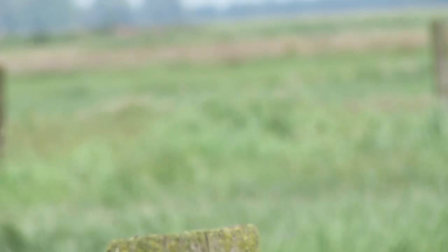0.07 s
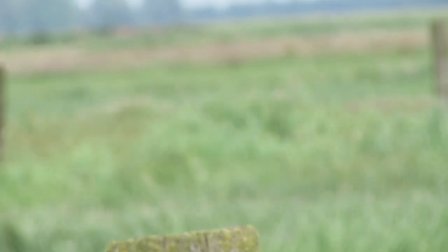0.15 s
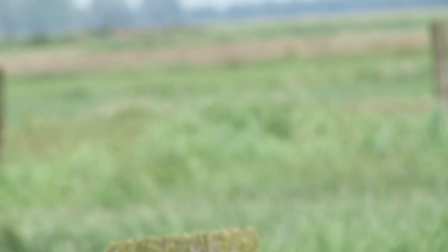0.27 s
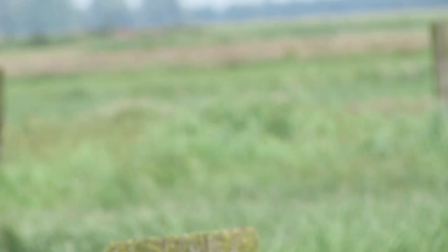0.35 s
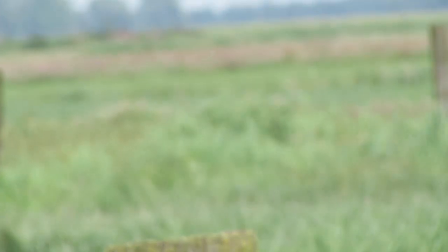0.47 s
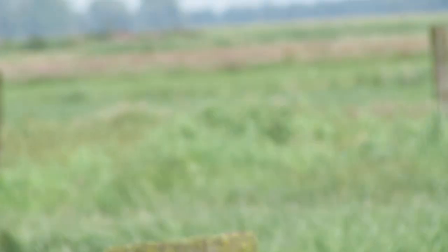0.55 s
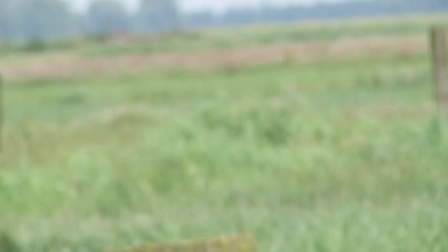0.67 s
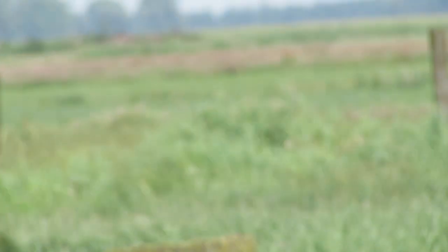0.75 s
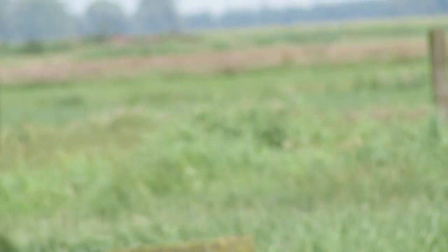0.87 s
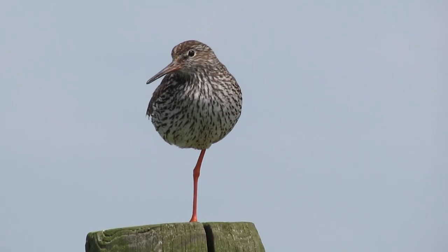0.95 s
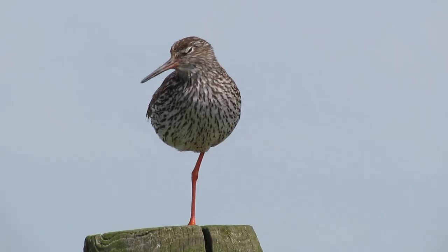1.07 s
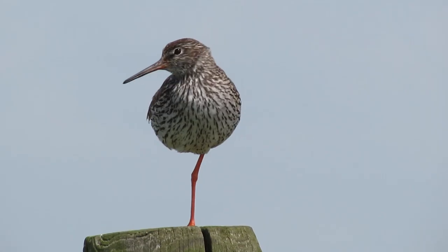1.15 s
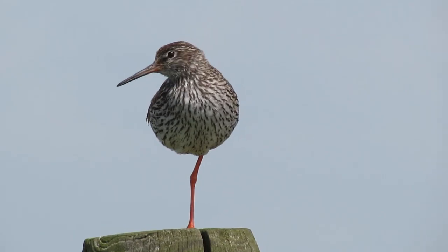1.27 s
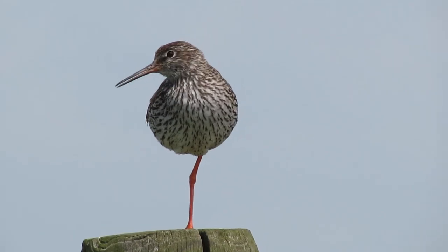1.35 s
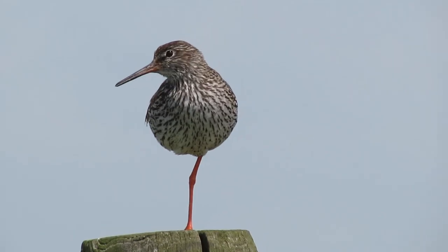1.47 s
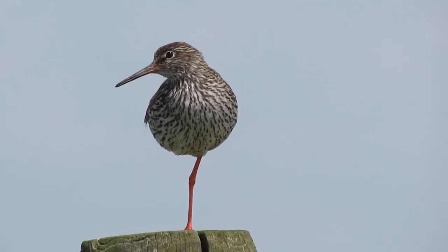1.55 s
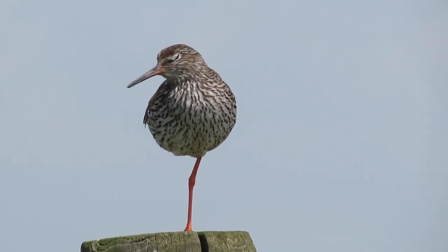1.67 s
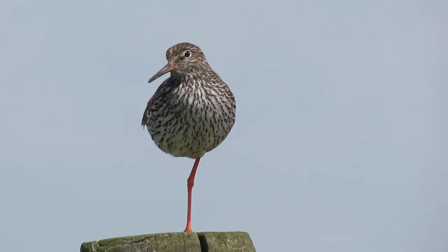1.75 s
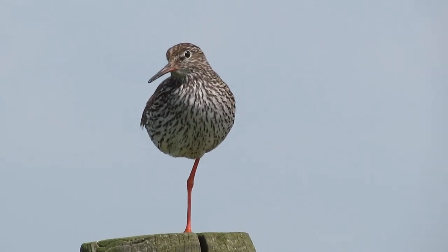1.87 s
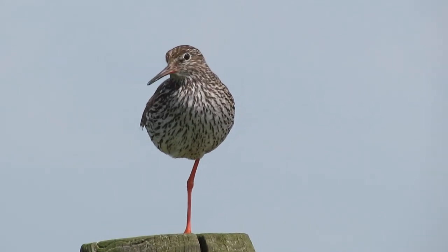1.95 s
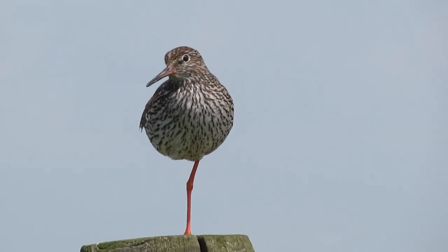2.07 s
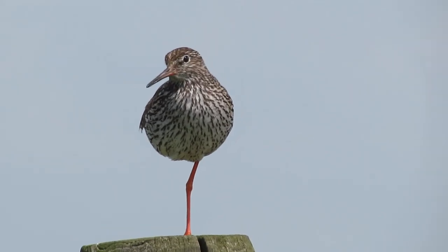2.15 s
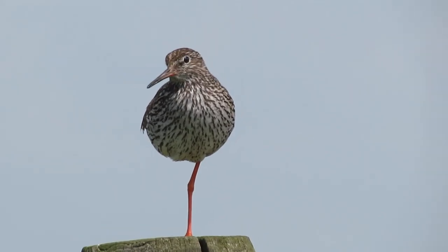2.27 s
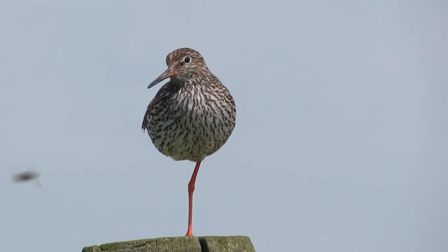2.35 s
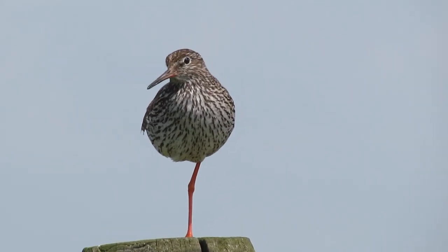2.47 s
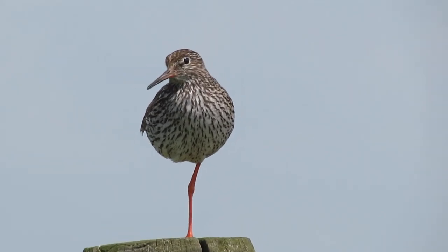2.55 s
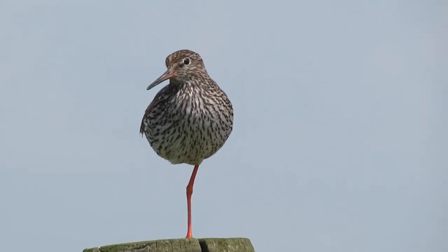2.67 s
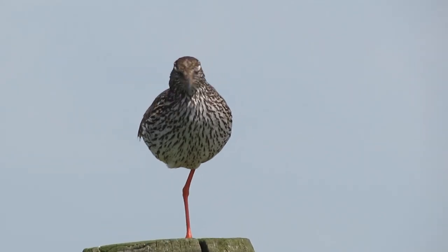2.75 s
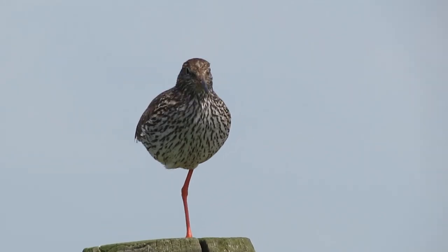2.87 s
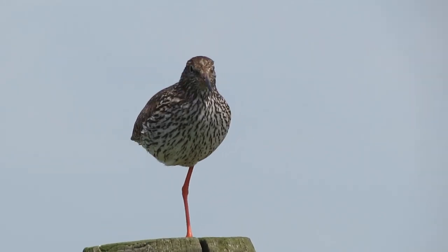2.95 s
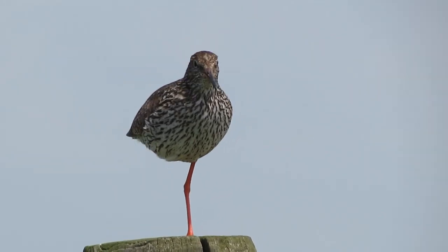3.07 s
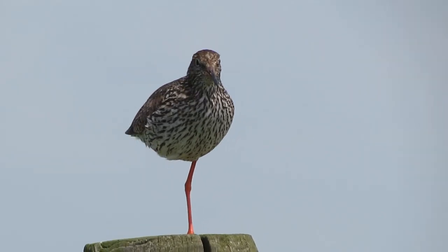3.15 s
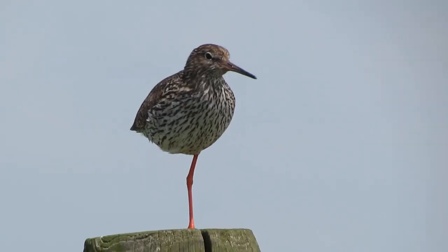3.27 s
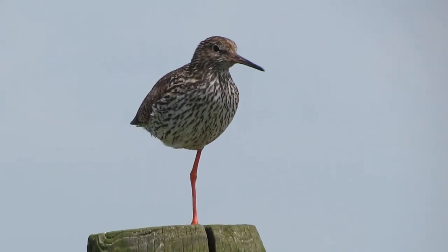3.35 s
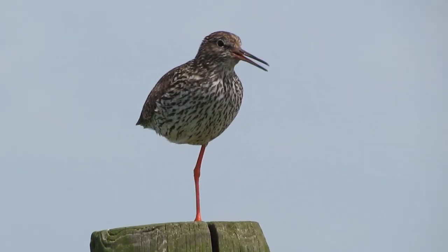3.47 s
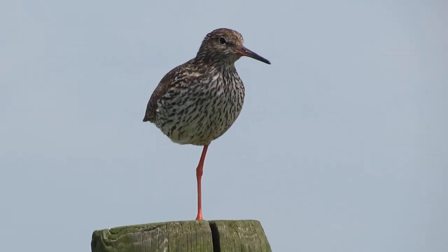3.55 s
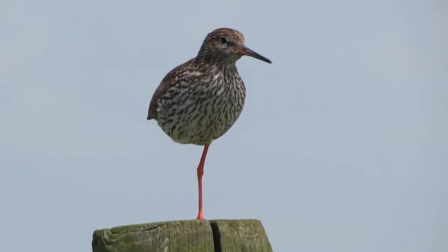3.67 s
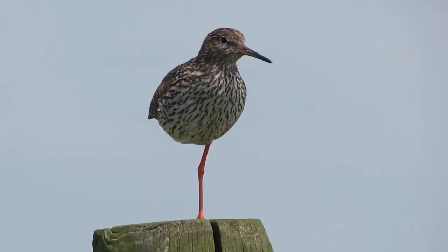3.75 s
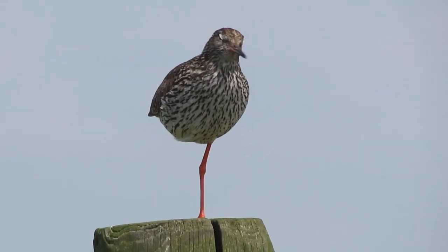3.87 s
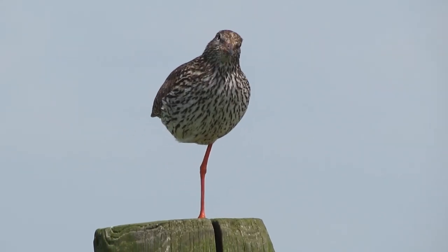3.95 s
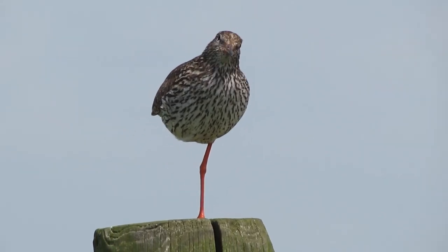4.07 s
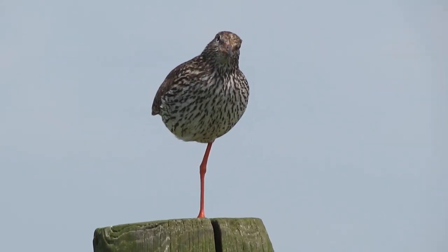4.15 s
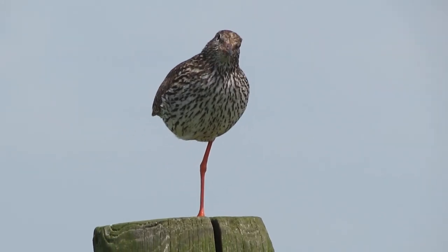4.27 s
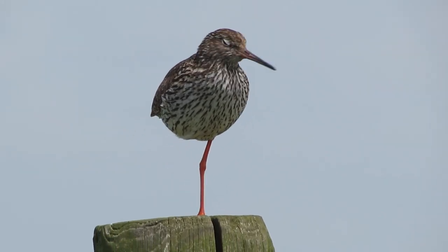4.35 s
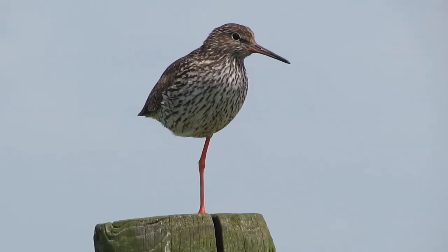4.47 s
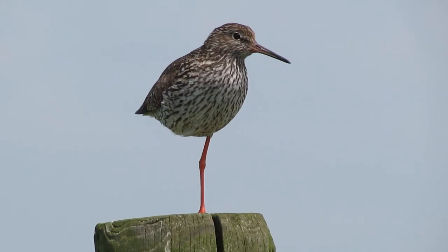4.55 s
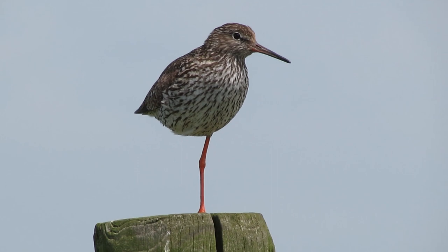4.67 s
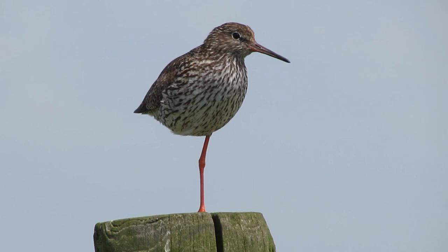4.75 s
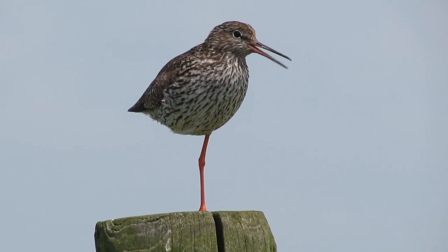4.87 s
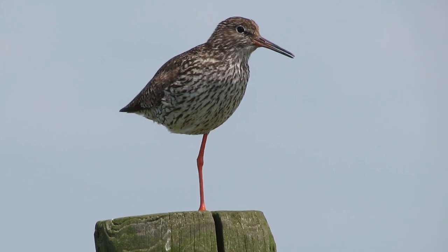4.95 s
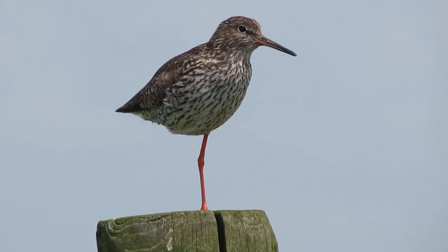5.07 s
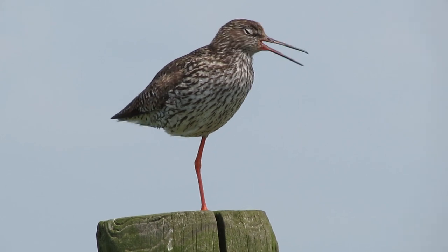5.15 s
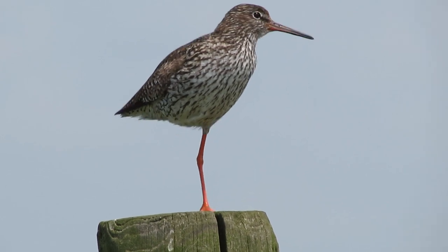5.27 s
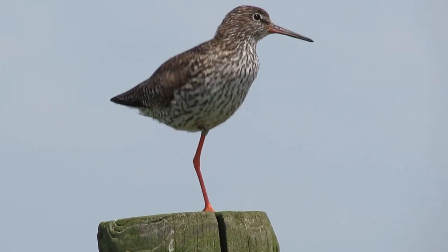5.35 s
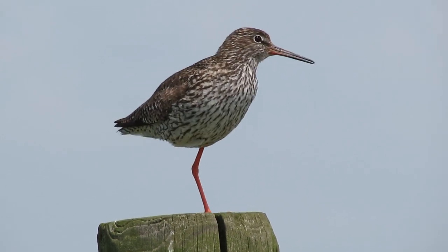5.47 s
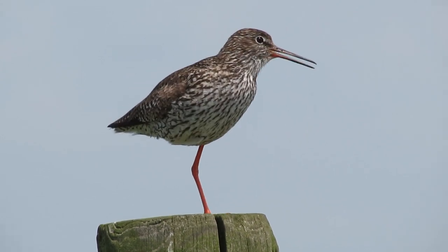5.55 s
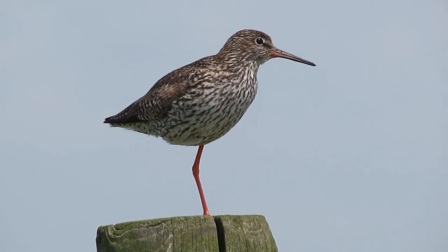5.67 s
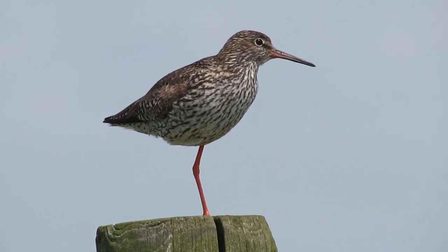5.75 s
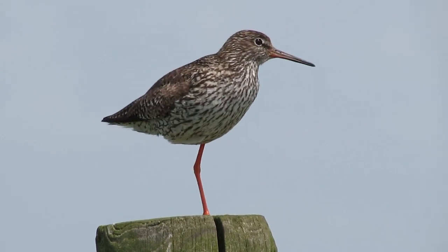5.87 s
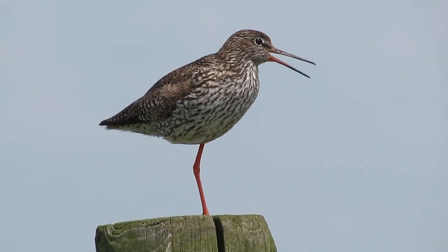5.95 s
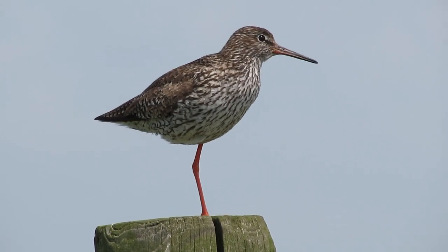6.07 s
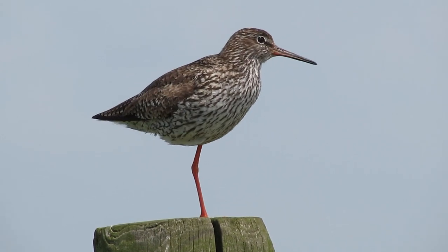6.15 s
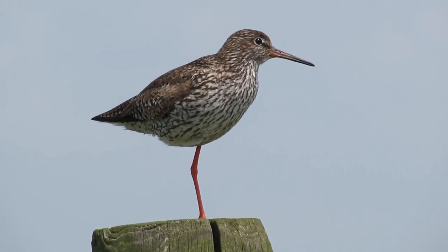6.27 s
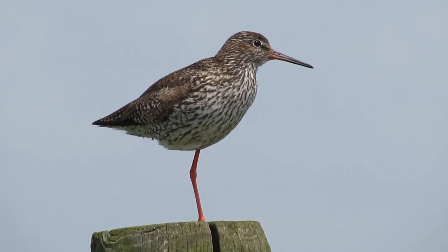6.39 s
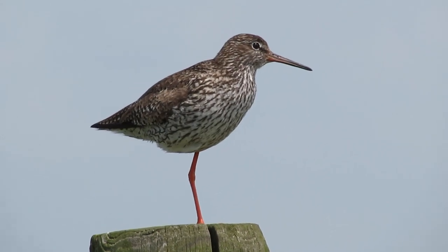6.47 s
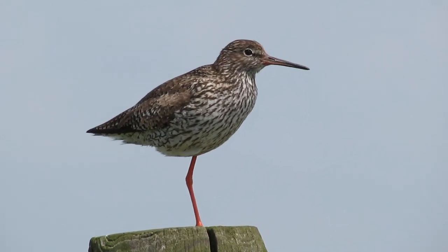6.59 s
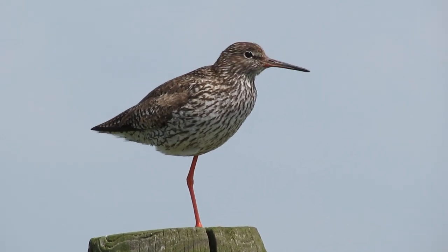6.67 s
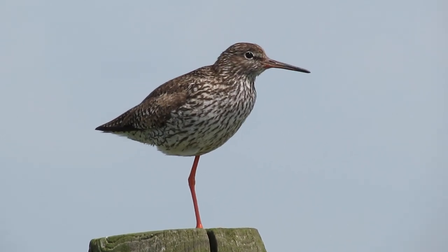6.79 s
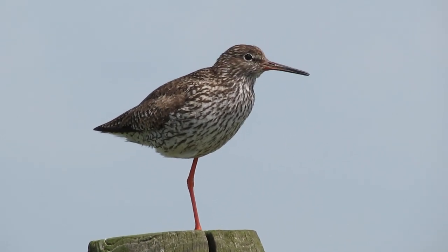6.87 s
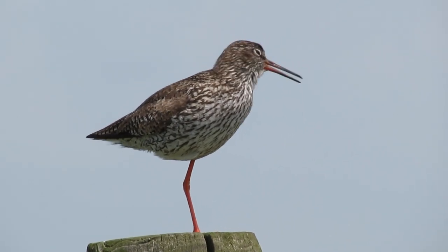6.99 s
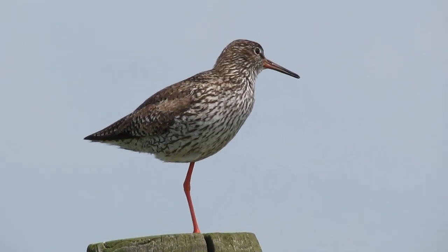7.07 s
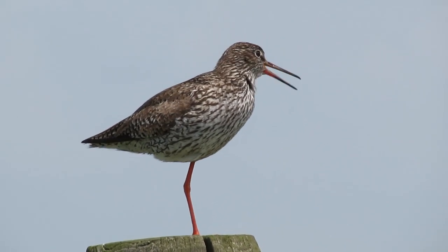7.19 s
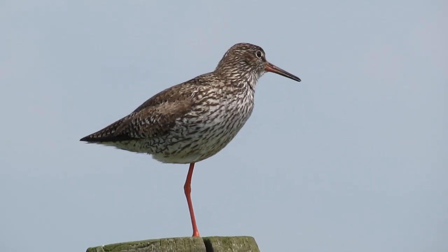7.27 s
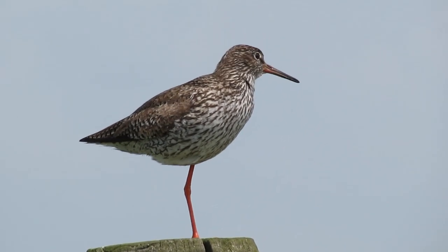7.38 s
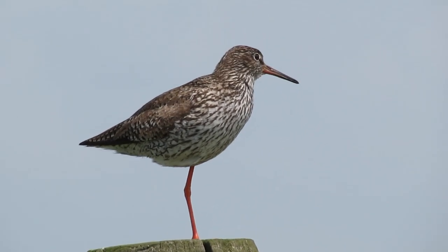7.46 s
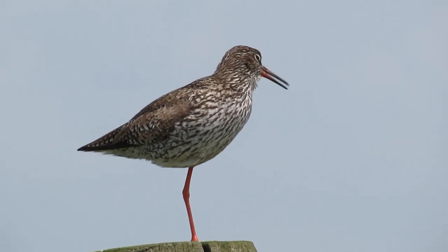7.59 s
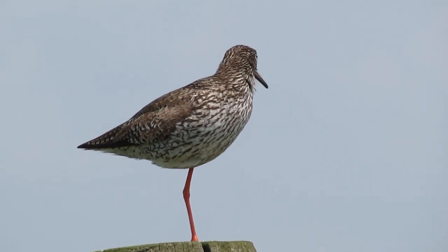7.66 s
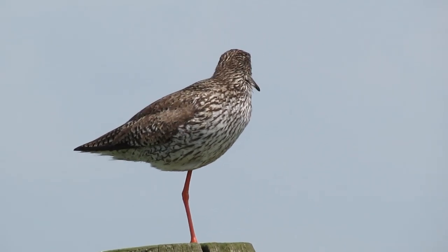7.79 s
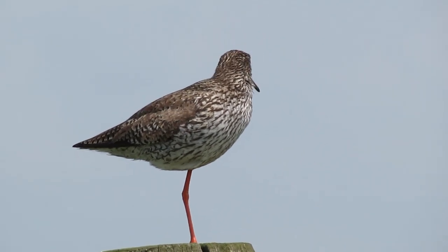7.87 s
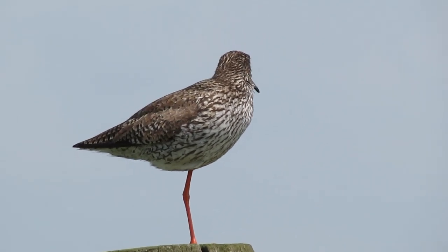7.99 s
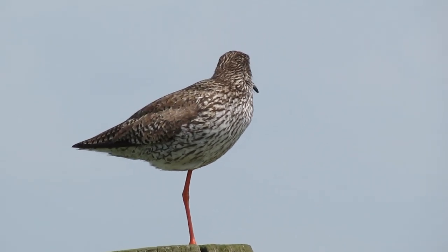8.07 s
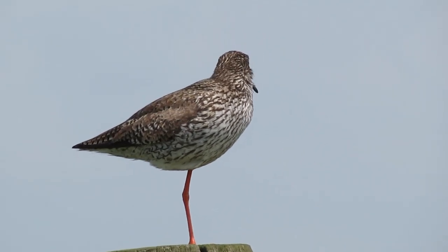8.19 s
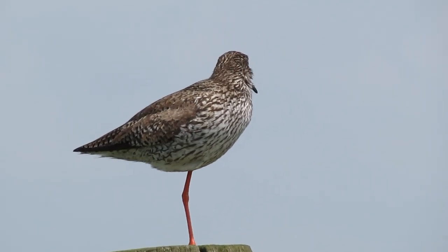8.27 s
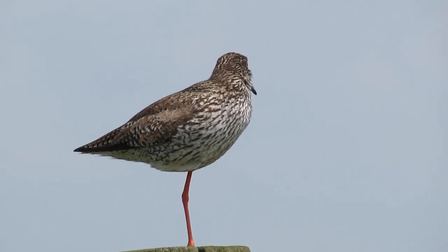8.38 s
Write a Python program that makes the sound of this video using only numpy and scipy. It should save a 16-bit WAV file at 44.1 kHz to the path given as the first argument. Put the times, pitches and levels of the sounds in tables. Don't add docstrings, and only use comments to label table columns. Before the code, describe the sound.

Quiet open meadow in wide stereo: soft airy hiss and a low, uneven rumble of far traffic. At 0.04 s a nearby wader gives a sharp chip, under a tenth of a second: a rough throat croak, a thin high squeak, then a piercing whistle falling slightly around 2.5 to 2.9 kHz. At 0.96 s the background changes abruptly to a nearer grassy hiss. Chips follow at 1.1 and 1.5, then 3.1 and 3.55, then 4.95, 5.25, 5.6 and 6.05, finally 7.05, 7.3 and 7.7, the last two strongest. Short returns barely blur them. Between them, very faint distant larks and waders chip, trill and slur, with a clearer falling answer at 5.5. Traffic swells briefly near 3.5 and longer around 4.15. A faint finger tick comes at 4.87; a weak low engine hum rises after 7.5. Wind and birds continue until about 8.4.

```python
import sys
import numpy as np
from scipy import signal
from scipy.fft import rfft, irfft, next_fast_len
from scipy.io import wavfile
from scipy.ndimage import map_coordinates

SR = 44100
rng = np.random.default_rng(int(sys.argv[2]) if len(sys.argv) > 2 else 0)


def volts_from_decibels(level):
    exponent = np.asarray(level, float) / 20
    return 10 ** exponent


def dump_mix(stems):
    frames = np.atleast_2d(stems).T
    limited = np.clip(frames, -1, 1)
    pcm = np.round(limited * 32767).astype(np.int16)
    wavfile.write(sys.argv[1], SR, pcm)


N = 371322

# [f/Hz, level per Hz/dB]
AIR_BEFORE = [(12, -33), (20, -9), (47, 2.5), (90, -0.5), (710, -14), (1050, -13), (1680, -20), (5000, -26),
              (10600, -34), (12200, -34.5), (13300, -33), (15700, -67)]
# [f/Hz, side minus mid level/dB]
WIDTH_BEFORE = [(60, 3), (110, 6.5), (200, 6.5), (380, 5.5), (700, 6), (1290, 2), (2380, 2), (4400, -1.5),
                (8120, 1), (15000, 2)]
# [f/Hz, level per Hz/dB]
AIR_AFTER = [(12, -49), (20, -8.5), (59, 0), (93, -5.5), (162, -1), (299, -9), (374, -12), (653, -17.5),
             (1020, -16.5), (1550, -21.5), (5280, -22.5), (12500, -33), (15700, -37)]
# [f/Hz, side minus mid level/dB]
WIDTH_AFTER = [(60, 3.5), (110, 4.5), (200, 1), (380, 6.5), (700, 4.5), (1290, 1.5), (2380, 2),
               (4400, -4.5), (8120, 2), (15000, 3.5)]
# [t/s, half length/s, level over the usual rumble/dB]
PASSES = [
    (0.498, .06, 5),
    (1.15, 0.26, 2),
    (2.398, 0.39, 3.5),
    (3.466, 0.055, 9.5),
    (4.15, 0.56, 8),
    (5.502, 0.11, 4),
    (6.8, 0.33, 2),
]
# [t/s, level/dB]
GRASS = [
    (.96, 1),
    (2.0, -0.5),
    (2.4, 0.5),
    (3.6, -0.4),
    (4.45, -1.5),
    (5.2, 1),
    (6.6, -0.5),
    (8.42, 1),
]
# [t/s, rise time/s, rise level/dB, hold level/dB, f at the break/Hz]
CROAKS = [(0.0407, 0.011, -32, -36.5, 1553), (1.082, .012, -35, -29, 1360),
          (1.486, 0.011, -32.5, -31, 1536), (3.111, 0.0097, -33, -26, 1456),
          (3.5559, 0.014, -27.5, -28, 1470), (4.97, 0.013, -31.5, -27.5, 1450),
          (5.244, .013, -33.5, -25.5, 1485), (5.624, .011, -32, -30.5, 1474),
          (6.043, .011, -28, -29.5, 1500), (7.037, 0.011, -25.5, -27.5, 1470),
          (7.285, 0.013, -34.5, -27.5, 1444), (7.6723, 0.012, -27.5, -28, 1470)]
# [t/s, f/Hz, level/dB, overtone level/dB]
SQUEAKS = [(0.059, 5140, -31.5, -22), (1.101, 5200, -33.5, -20), (1.507, 5230, -29, -14),
           (3.129, 5210, -29.5, -8), (3.578, 5100, -31, -7), (4.988, 5080, -31, -18),
           (5.263, 5020, -30, -15), (5.641, 4960, -31, -12), (6.061, 5110, -26, -18),
           (7.057, 5030, -27, -13), (7.303, 4900, -33.5, -6), (7.691, 4960, -33, -7.5)]
# [t/s, length/s, start f/Hz, end f/Hz, peak level/dB]
WHISTLES = [(0.064, 0.022, 3360, 2590, -24.5), (1.11, 0.026, 2890, 2630, -18.5),
            (1.51, 0.026, 2950, 2595, -23.5), (3.137, .012, 2810, 2660, -22),
            (3.585, .021, 2880, 2510, -23.7), (4.998, 0.028, 2800, 2540, -22.5),
            (5.271, .033, 2860, 2504, -19.5), (5.649, 0.03, 2910, 2487, -17.5),
            (6.068, 0.021, 2905, 2510, -16.5), (7.061, 0.032, 2810, 2500, -21.5),
            (7.309, 0.037, 2870, 2480, -12.5), (7.696, 0.034, 2887, 2446, -13.5)]
# [3rd partial level/dB, rasp level/dB, left minus right level/dB,
# treble left minus right level/dB, turn-away level/dB]
HEADS = [(-35, 5.5, -6.5, -3, -8), (-32, 0.5, -1, -1.8, -15), (-21, 3.5, -2, 1.5, 2), (-19, 1, -5.5, 1, 0),
         (-25, -2.5, -1.5, 0, -5), (-21.5, -1, -2.5, 0, -9), (-23, -6.5, -3, 2, -0.5),
         (-25.5, -3, -2.5, 2, -7), (-19.5, 0.5, -3.5, -0.5, -8), (-21, -5.5, -2, 1, -5),
         (-25.5, -3.5, -1.5, 4, -10), (-25, -6.5, -1.4, 3, -19)]
# [time until fully open/s,
# then level against its peak/dB at entry, middle, late part, end]
BREATHS = [(.0006, -3, -.6, -.6, -4.5), (.0012, -8, -5, -8, -13), (.0045, .6, -3, -7, -7),
           (.0012, -1.2, .3, -1.2, -3), (.0015, 2.2, -1.2, -1.2, -4), (.006, -2.2, -2.2, -2.5, -6),
           (.0035, -2.2, -3.5, -2.2, -6), (.0003, -6, .6, -4.5, -9), (.0015, -6, -2.2, -5.5, -7.5),
           (.0015, 2.2, 3.5, 1.5, -3), (.0021, -4, -5, -5.5, -7.5), (.0012, -6, -5.5, -9.5, -17)]
# [f/Hz, width/Hz, level/dB]
THROAT = [(2803, 1780, 4), (4380, 3300, -10), (6330, 1060, -4.5), (7660, 870, -19), (10900, 2000, -19)]
PORT_LEAD = [-1.5, 0.71]
# [t/s, length/s, start f/Hz, end f/Hz, level/dB]
FAR_LEFT = [
    (1.83, 0.015, 3100, 2900, -46.5),
    (1.86, 0.015, 3080, 2960, -47.5),
    (1.88, 0.046, 4560, 3980, -58),
    (4.62, 0.054, 3440, 3420, -58),
    (4.68, 0.044, 3430, 3450, -55.5),
    (6.27, 0.018, 5380, 4630, -56),
    (6.58, 0.032, 4980, 4170, -59),
    (6.93, 0.023, 4800, 4650, -60),
]
# [t/s, length/s, start f/Hz, end f/Hz, level/dB]
FAR_AHEAD = [(.18, .02, 5150, 5550, -62), (.267, .07, 4900, 5450, -65), (.39, 0.075, 4600, 5250, -66),
             (.53, .085, 4500, 5140, -64), (1.165, .021, 4130, 3670, -55), (1.318, 0.015, 5000, 3980, -60),
             (1.415, .01, 2600, 2200, -51), (1.66, .079, 4520, 4440, -61.5),
             (1.77, .125, 3960, 3730, -57.5), (2.42, 0.038, 3280, 3520, -58),
             (2.785, .025, 2580, 2950, -57), (2.3, 0.24, 760, 758, -61), (2.34, 0.076, 1506, 1453, -59),
             (4.24, 0.15, 3940, 3600, -59.5), (6.67, .05, 3850, 3830, -64),
             (7.245, 0.089, 3440, 3464, -53.5)]
# [t/s, length/s, start f/Hz, end f/Hz, level/dB]
FAR_RIGHT = [
    (.09, 0.046, 4700, 4200, -67),
    (.146, 0.014, 3050, 2680, -50),
    (.2, .11, 3840, 3720, -69),
    (.425, 0.026, 2900, 2930, -59),
    (.672, .016, 3280, 3200, -55),
    (.692, 0.018, 3240, 3070, -52.5),
    (1.34, 0.026, 4150, 4420, -52.5),
    (7.16, 0.035, 4500, 4300, -57),
]
# [t/s, length/s, start f/Hz, end f/Hz, level/dB]
SWOOPS = [
    (2.011, 0.16, 4600, 3600, -52),
    (4.514, 0.16, 4360, 3670, -55.5),
    (7.786, .04, 4680, 4100, -57),
    (8.002, 0.15, 4670, 3840, -51.5),
    (8.328, 0.11, 4620, 3680, -56.5),
]
# [t/s, length/s, start f/Hz, end f/Hz, level/dB]
KIN = [
    (5.474, 0.18, 3270, 2220, -44.5),
    (8.082, 0.18, 3150, 2200, -58),
]
# [t/s, top f/Hz, level/dB]
ARCHES = [
    (2.51, 3280, -59),
    (2.597, 3200, -58.5),
    (2.684, 3180, -59.5),
]
# [t/s, chips, gap/s, middle f/Hz, level/dB]
TRILLS_UP = [
    (3.446, 4, .0145, 4050, -54),
    (3.862, 6, .026, 4300, -56.5),
    (5.74, 3, .03, 4050, -59),
    (6.466, 7, .0255, 4100, -59.5),
]
# [t/s, chips, gap/s, middle f/Hz, level/dB]
TRILLS_DOWN = [
    (.772, 9, .0216, 3480, -56.5),
    (3.26, 3, .014, 4100, -59),
    (6.17, 4, .014, 3300, -57),
    (6.312, 5, .0125, 3300, -58),
    (6.77, 4, .0165, 4520, -56),
]
# [t/s, length/s, start f/Hz, end f/Hz, level/dB]
BLURRED = [
    (2.255, .1, 4500, 4150, -63),
    (3.303, .14, 4900, 3900, -61),
    (3.51, .16, 4900, 3850, -59),
    (3.7, .062, 3540, 3300, -57),
    (7.83, .14, 4200, 3700, -62),
    (5.21, .022, 4750, 4200, -58),
]
# [t/s, length/s, start f/Hz, end f/Hz, level/dB]
STROKES = [(.134, .016, 4200, 3000, -62), (2.251, .007, 4960, 4000, -49), (2.252, .007, 3600, 2400, -55),
           (2.3, .02, 3700, 3200, -57), (3.345, .016, 4150, 3250, -55), (3.366, .014, 2820, 2350, -55),
           (3.606, .01, 3320, 3700, -49), (4.804, .011, 2200, 3440, -57), (4.83, .012, 2200, 3300, -54),
           (4.858, .012, 2200, 3200, -56), (4.886, 0.0093, 2300, 3200, -55), (5.043, .02, 3700, 4300, -54),
           (5.192, .014, 4250, 4650, -54), (5.228, .016, 3870, 4120, -52), (5.75, .008, 4300, 3850, -56),
           (5.926, .01, 3170, 3250, -57), (6.18, 0.023, 2850, 2500, -58), (6.292, .008, 5000, 4600, -59),
           (6.422, .014, 5550, 5400, -58), (7.79, .012, 5000, 5150, -53)]
# [t/s, f/Hz, level/dB]
ENGINES = [
    [(.9, 67.3, -54.5), (1.6, 66.5, -58.5), (3.6, 66.16, -64.5), (5.5, 66.5, -64), (7.2, 67, -59),
     (8.42, 65.6, -64)],
    [(7.4, 65.2, -71), (7.55, 77.4, -50.5), (7.87, 94, -58), (8.0, 88.1, -58), (8.42, 78, -56)],
]
WHISPERED = [1, 2, 3, 6, 10]
# [t after the tick/s, width/s, size]
KNOCKS = [
    (.0004, 0.000027, 1.7),
    (.0015, 0.000079, -3.5),
    (.0026, .00015, 0.9),
    (.0058, 0.00038, 0.95),
]

SCENE_CHANGE_S = .958
AIR_BEFORE_DB, AIR_AFTER_DB = -52.5, -50.5
CROAK_HZ, HOLD_HZ = 1033, 2188
JUMP_S, RASP_SHARE, CHEST_DB = .001, .45, -44.5
ATTACK_S, OPENING_S, CLOSING_S = .0054, .0022, .004
BEND, SECOND_DB = 2, -43.5
VEIL_DB, SUM_TONE_DB = -34, 8
POST_S, POST_DB = .0099, -15
ECHO_DB, ECHO_SHARE = -18.5, .46
BLUR_S, BLUR_DB = .01, -33
SWOOP_S, SWOOP_SHARE, SWOOP_FADE_DB = .018, .58, -4
KIN_DROP, KIN_FADE_DB = .13, -5
ARCH_S, ARCH_TOP, ARCH_RISE, ARCH_FALL = .05, .5, .12, .36
DROOP, LIFT = 2.4, .8
BROKEN_DB, BROKEN_PITCH = 4, .012
CHIP_S, CHIP_UP, CHIP_DOWN = .01, .07, -.02
TICK_S, TICK_DB = 4.8716, -36


def colour(table, hz):
    f, db = np.transpose(table)
    return np.interp(np.log(hz + 1e-9), np.log(f), db)


def walk(rate, size):
    knots = rng.standard_normal(128)
    return 0.962 * map_coordinates(knots, [np.arange(size) * rate / SR], order=1, mode="wrap")


def tone(hz):
    return 2 * np.pi * np.cumsum(hz) / SR


def gate(t, start, end, attack, release):
    opening = np.clip((t - start) / attack, 0, 1)
    closing = np.clip((end - t) / release + 1, 0, 1)
    return np.sin(np.pi / 2 * opening * closing) ** 2


def filtered(x, order, hz, kind="low"):
    return signal.sosfilt(signal.butter(order, hz, kind, fs=SR, output="sos"), x)


def add(out, x, at, pan_db, lead, treble_pan_db=None):
    size = next_fast_len(np.shape(x)[-1] + 64)
    side = np.array([[.5], [-.5]])
    treble = np.clip((np.arange(size // 2 + 1) * SR / size - 3500) / 1200, 0, 1)
    if treble_pan_db is not None:
        pan_db = pan_db + (treble_pan_db - pan_db) * treble
    turn = np.exp(1j * lead * side * (1 - 0.037 * treble))
    pair = irfft(rfft(x, size) * turn * volts_from_decibels(pan_db * side), size)
    i = int(at * SR)
    out[:, i:i + size] += pair[:, :N - i]


def air(spectrum, db, wide, road_db, grass_db, count):
    size = next_fast_len(count)
    hz = np.arange(size // 2 + 1) * SR / size
    noise = rfft(rng.standard_normal((2, size))) * volts_from_decibels(colour(spectrum, hz))
    noise *= volts_from_decibels(db) / np.std(irfft(noise[0], size))
    noise[1] *= volts_from_decibels(colour(wide, hz))
    out, gust = 0, walk(1.0, count)
    for centre_hz in 22 * 2 ** np.arange(0, 10):
        share = np.cos(np.pi / 2 * np.clip(np.log2(hz / centre_hz + 1e-9), -1, 1)) ** 2
        breath_db = .5 * gust + .6 * walk(5, count)
        breath_db = breath_db + road_db * np.exp(-np.log2(centre_hz / 190) ** 2 / 0.39)
        breath_db = breath_db + grass_db * (centre_hz > 2000)
        out = out + irfft(noise * share, size)[:, :count] * volts_from_decibels(breath_db)
    mid, side = out
    return np.array([mid + side, mid - side]) * volts_from_decibels(np.array([[-.5], [.5]]))


def croak(t, rise, hold, start_hz, break_hz, rise_db, hold_db, rasp_db):
    u = np.clip(t / rise, 0, 1)
    jumped = np.clip((t - rise) / JUMP_S + .5, 0, 1)
    low_hz = .93 * start_hz
    hz = (1 - jumped) * (low_hz + (break_hz - low_hz) * u ** 2.22) + jumped * HOLD_HZ
    unrest = np.exp(-((t - rise) / 0.0029) ** 2)
    phase = tone(hz * (1 + (.02 + .08 * unrest) * walk(1100, len(t))))
    effort_db = (1 - jumped) * (rise_db - 8.0 + 13 * u ** 3.5) + jumped * (hold_db + 1)
    bright_db = rasp_db + 6.0 - 3.7 * (2.0 - unrest) * (1.5 - jumped) - 10.7 * jumped
    voice = 0
    for k in range(1, 14):
        gain = sum(volts_from_decibels(db) / (1 + (2 * (k * hz - f) / w) ** 2) ** 2 for f, w, db in THROAT)
        gain = gain + volts_from_decibels(CHEST_DB - effort_db) / (1 + (k * hz / 1500) ** 8)
        bright = volts_from_decibels(np.clip(k * hz / 3500 - 1, 0, 1) * bright_db)
        bright = bright * volts_from_decibels((3.2 + .4 * k) * walk(550, len(t)))
        voice = voice + gain * bright * (k * hz < 12000) * np.sin(k * phase + 0.58 * k * k)
    hiss = filtered(rng.standard_normal(len(t)), 2, [2200, 9000], "band")
    voice = voice + volts_from_decibels(rasp_db - 7.5) * (unrest + RASP_SHARE * (jumped + .5 * u)) * hiss
    voice = filtered(voice, 4, 11500)
    return voice * volts_from_decibels(effort_db + 0.7 * walk(553, len(t))) * gate(t, 0, rise + hold - .001, 0.003, 0.0016)


def squeak_and_whistle(t, high, song, opens, third_db, breath):
    late, entry_db, middle_db, late_db, end_db = breath
    at, hz, db, octave_db = high
    start, span, start_hz, end_hz, peak_db = song
    at, start = at - opens, start - opens
    sag = 1.015 - 0.0089 * np.clip((t - at) / (start - at), 0, 1.5)
    squeak_phase = tone(hz * sag * (1 + 0.0034 * walk(440, len(t))))
    squeak = np.sin(squeak_phase) + volts_from_decibels(octave_db) * np.sin(2 * squeak_phase)
    squeak = squeak + volts_from_decibels(-7.0) * np.sin(squeak_phase / 2)
    squeak = squeak * volts_from_decibels(db + 1.5 + 1.0 * walk(340, len(t)))
    squeak = squeak * gate(t, at - .001, start + late - .003, 0.003, 0.005)

    u = np.clip((t - start) / span, -.15, 1.3)
    phase = tone(end_hz + 1.43 * (start_hz - end_hz) * (np.exp(-BEND * u) - np.exp(-BEND)))
    third = volts_from_decibels(third_db + 1.5 - 9.7 * u ** 2 + 2.5 * np.sin(squeak_phase / 40))
    whistle = np.sin(phase) + volts_from_decibels(SECOND_DB - peak_db - 5.3 * u ** 2) * np.sin(2 * phase)
    whistle = whistle + third * np.sin(3 * phase) + volts_from_decibels(third_db - 21) * np.sin(4 * phase)
    swell_db = peak_db + np.interp((t - start - late) / (span - late),
                                   [0, min(ATTACK_S / span, .3), .45, .7, .95, 1.3],
                                   [entry_db, 0, middle_db, late_db, end_db, end_db - 13])
    swell_db = swell_db + .7 * walk(250, len(t))
    full = volts_from_decibels(swell_db) * gate(t, start + late - .001, start + span - .001, OPENING_S, CLOSING_S)
    veiled = volts_from_decibels(VEIL_DB) * gate(t, start - .004, start + late, .004, .002)
    whistle = whistle * (full + veiled)

    both = volts_from_decibels(db + octave_db + SUM_TONE_DB - 5.0) * np.sin(squeak_phase + phase)
    both = both * gate(t, start - .004, start + late, 0.006, 0.0032)
    haze = filtered(rng.standard_normal(len(t)), 2, [2500, 9000], "band")
    haze = haze * volts_from_decibels(db - 15) * gate(t, at - .003, start + .002, 0.0059, 0.034)
    return haze + squeak + whistle + both


def call(low, high, song, head, breath):
    t = np.arange(int(.1 * SR)) / SR
    opens, rise, rise_db, hold_db, break_hz = low
    third_db, rasp_db = head[:2]
    hold = high[0] - opens - rise
    rough = croak(t, rise, hold, CROAK_HZ, break_hz, rise_db, hold_db, rasp_db)
    return rough + squeak_and_whistle(t, high, song, opens, third_db, breath)


def wader(out):
    t = np.arange(int(.2 * SR)) / SR
    for low, high, song, head, breath in zip(CROAKS, SQUEAKS, WHISTLES, HEADS, BREATHS):
        dry = call(low, high, song, head, breath)
        near = int(low[0] > SCENE_CHANGE_S)
        if not near:
            dry = filtered(dry, 2, 7500)
        turn_db = ECHO_SHARE * head[4]
        chance = rng.standard_normal((3, len(t)))
        scatter = (0.82 * chance[0] + .5 * chance[1:]) * (np.exp(-t / 0.013) + volts_from_decibels(-32.0) * np.exp(-t / 0.061))
        scatter = signal.lfilter([.4], [1, -.6], scatter * np.clip(t / 0.014, 0, 1))
        wet = signal.fftconvolve(dry[None], scatter * volts_from_decibels(ECHO_DB + turn_db - 10.5), axes=1)
        wet[:, :len(dry)] += dry
        post = int(POST_S * SR)
        wet[:, post:post + len(dry)] += volts_from_decibels(POST_DB + turn_db) * dry
        add(out, wet, low[0], head[2], PORT_LEAD[near], head[3])


def far_note(out, at, length, pitch_hz, db, pan_db, fade_db=0, waver_db=1.5, waver=.003):
    t = np.arange(int(length * SR)) / SR
    edge = min(.007, t[-1] / 2)
    level_db = db + fade_db * t / length + waver_db * walk(70, len(t))
    shape = gate(t, 0, t[-1] - edge, edge, edge) ** .5 * volts_from_decibels(level_db)
    note = shape * np.sin(tone(pitch_hz(t, t / length) * (1 + waver * walk(200, len(t)))))
    way = volts_from_decibels(BLUR_DB) * rng.standard_normal((2, 2048)) * np.exp(-np.arange(2048) / SR / BLUR_S)
    way[:, 0] = .95
    add(out, signal.fftconvolve(note[None], way, axes=1), at, pan_db, 0)


def arch(u, top_hz):
    rising = ARCH_RISE * (1 - u / ARCH_TOP) ** 2
    falling = ARCH_FALL * ((u - ARCH_TOP) / (1 - ARCH_TOP)) ** 2
    return top_hz * (1 - np.where(u < ARCH_TOP, rising, falling))


def swoop(t, u, a, b):
    return b + (a - b) * (SWOOP_SHARE * np.exp(-t / SWOOP_S) + (1 - SWOOP_SHARE) * (1 - u))


def far_birds(out):
    for notes, pan_db in ((FAR_LEFT, 8), (FAR_AHEAD, 1.5), (FAR_RIGHT, -9)):
        for at, length, a, b, db in notes:
            bend = DROOP if b < a else LIFT
            far_note(out, at, length, lambda t, u: a + (b - a) * u ** bend, db, pan_db)
    for at, length, a, b, db in STROKES:
        far_note(out, at, length, lambda t, u: a + (b - a) * u, db, 1.5)
    for trills, sweep in ((TRILLS_UP, CHIP_UP), (TRILLS_DOWN, CHIP_DOWN)):
        for at, chips, gap, hz, db in trills:
            for k in range(chips):
                far_note(out, at + k * gap, CHIP_S, lambda t, u: hz * (1 + sweep * (2 * u - 1)), db, 1.9)
    for at, length, a, b, db in SWOOPS:
        far_note(out, at, length, lambda t, u: swoop(t, u, a, b), db, 7.2, SWOOP_FADE_DB)
    for at, length, a, b, db in BLURRED:
        far_note(out, at, length, lambda t, u: b + (a - b) * (1 - u) ** 1.4, db, 5.4,
                 0, BROKEN_DB, BROKEN_PITCH)
    for at, top_hz, db in ARCHES:
        far_note(out, at, ARCH_S, lambda t, u: arch(u, top_hz), db, 1.44)
    for at, length, a, b, db in KIN:
        far_note(out, at, length, lambda t, u: b + (a - b) * np.exp(-(u / KIN_DROP) ** 1.8), db, 1.5,
                 KIN_FADE_DB)


def engines(out):
    for rows in ENGINES:
        s, hz, db = np.transpose(rows)
        t = np.arange(s[0], s[-1], 1 / SR)
        hum = np.sin(tone(np.interp(t, s, hz) * (1 + 0.0199 * walk(5.7, len(t)))))
        add(out, hum * volts_from_decibels(np.interp(t, s, db) + 3.5 + 2.0 * walk(2.2, len(t))), s[0], -1.5, 1.2)


def lead_in(out):
    t = np.arange(int(0.022 * SR)) / SR
    for low in (CROAKS[k] for k in WHISPERED):
        whisper = np.sin(tone(HOLD_HZ * (1 + 0.039 * walk(420, len(t))))) * gate(t, 0, 0.029, 0.028, .003)
        add(out, whisper * volts_from_decibels(low[3] - 10.5 + 3.1 * walk(280, len(t))), low[0] - .018, -1, .5)


def tick(out):
    t = np.arange(int(.012 * SR)) / SR
    crack = 0.34 * rng.standard_normal(len(t)) * gate(t, 0, 0.00059, .0003, 0.00091)
    knocks = sum(size * np.exp(-((t - at) / width) ** 2) for at, width, size in KNOCKS)
    add(out, volts_from_decibels(TICK_DB) * (crack + knocks), TICK_S, 0, 0)


def scene():
    t = np.arange(N) / SR
    changed = np.clip((t - SCENE_CHANGE_S) / 0.0036, 0, 1)
    road_db = sum(db * np.exp(-((t - at) / half) ** 2) for at, half, db in PASSES) - 2.5
    grass_db = np.interp(t, *np.transpose(GRASS))
    out = changed * air(AIR_AFTER, AIR_AFTER_DB, WIDTH_AFTER, road_db, grass_db, N)
    before = air(AIR_BEFORE, AIR_BEFORE_DB, WIDTH_BEFORE, road_db[:SR] + 2, 0, SR)
    out[:, :SR] += (1 - changed[:SR]) * before
    for source in (wader, far_birds, engines, lead_in, tick):
        source(out)
    return out


def roll_off(x):
    return signal.sosfilt(signal.butter(12, 15820, fs=SR, output="sos"), x)


def record(dry):
    soft = signal.sosfilt(signal.ellip(6, .5, 50, 15200, fs=SR, output="sos"), dry)
    return roll_off(soft)


dry = scene()
out = record(dry)
dump_mix(out)
```